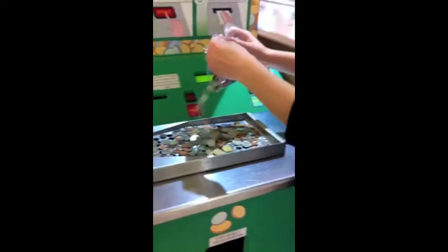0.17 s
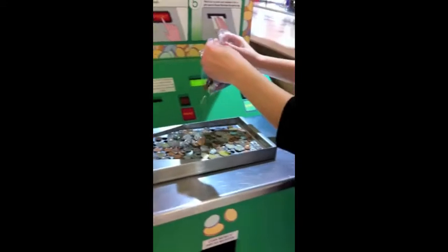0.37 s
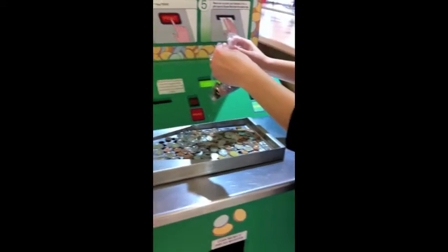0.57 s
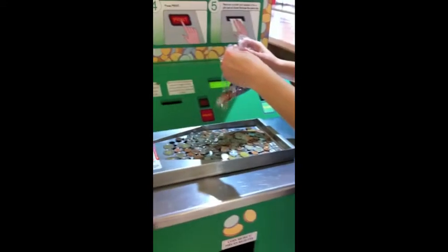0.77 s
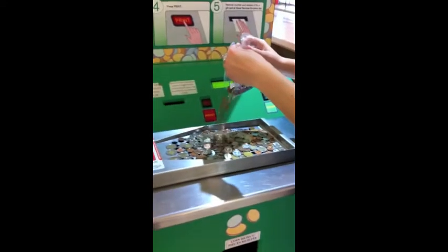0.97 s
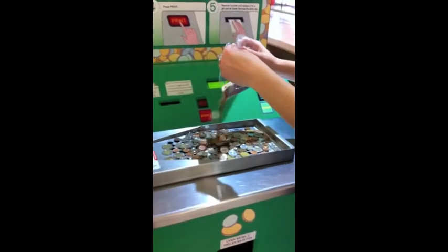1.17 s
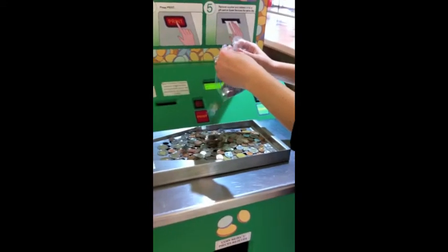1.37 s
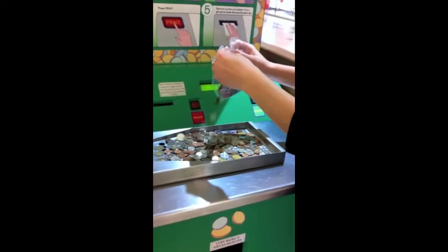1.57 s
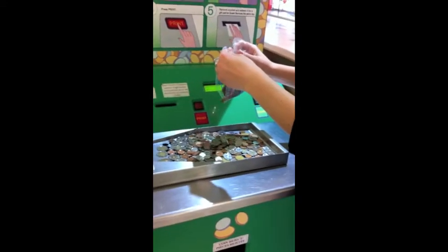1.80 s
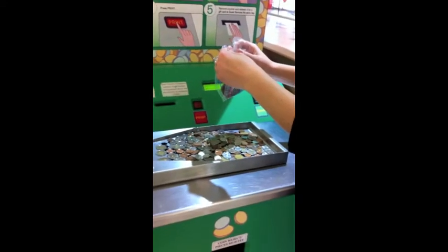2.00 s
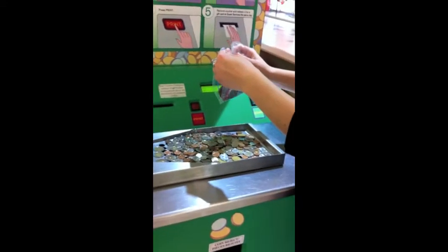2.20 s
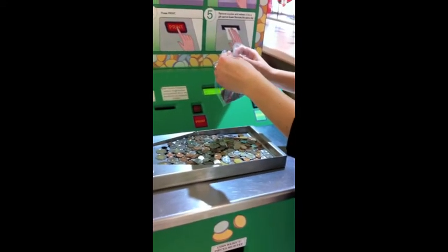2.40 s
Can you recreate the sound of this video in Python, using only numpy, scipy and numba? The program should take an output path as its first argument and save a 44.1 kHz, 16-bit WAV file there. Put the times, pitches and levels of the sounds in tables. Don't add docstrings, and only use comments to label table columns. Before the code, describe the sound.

After a brief faded-in hum and faint knocks, dense bright coin clatter bursts out and continues in waves, then stops almost abruptly, leaving tiny ticks and room hum; close phone pickup indoors.

```python
import sys
import numpy as np
from scipy import signal
from scipy.fft import rfft, irfft
from scipy.io import wavfile
from numba import njit

SR = 44100
rng = np.random.default_rng(int(sys.argv[2]) if len(sys.argv) > 2 else 0)


def bounce(signal):
    frames = np.transpose(np.atleast_2d(signal))
    limited = np.clip(frames, -1, 1)
    pcm = np.round(limited * 32767).astype(np.int16)
    wavfile.write(sys.argv[1], SR, pcm)


def ratio_of_db(decibels):
    return 10 ** (np.asarray(decibels, float) / 20)


N = 108045


def curve_db(table, hz):
    table = np.array(table, float)
    return np.interp(np.log(hz), np.log(table[:, 0]), table[:, 1])


def samples(seconds):
    return (seconds * SR).astype(np.int64).ravel()


@njit
def ring(start, hz, t60, size, count):
    y = np.zeros(count)
    for k in range(len(start)):
        turn = np.exp(2j * np.pi * hz[k] / SR - np.log(1000) / (t60[k] * SR))
        z = size[k] + 0j
        for i in range(start[k], min(count, start[k] + int(t60[k] * SR * 0.7))):
            y[i] += z.imag
            z *= turn
    return y


def scatter(shape):
    size = ratio_of_db(1.5 * np.minimum(rng.exponential(size=shape), 4))
    return size / np.sqrt(np.mean(size ** 2, axis=-1, keepdims=True))


# t/s, peak level/dB, tray level/dB, spread/s
HANDFULS = [(0.2243, -7.5, -18, 0.012), (0.3048, -6, -20, 0.015), (0.312, -11, -17, 0.012),
            (.343, -9, -14, 0.015), (0.373, -6.5, -28, 0.017), (.384, -12, -22, 0.012),
            (.45, -16, -24, .025), (.468, -9.5, -16, 0.019), (0.4816, -5, -20, 0.011),
            (.507, -12, -24, 0.011), (0.5895, -7, -30, 0.0085), (.6291, -12, -39, 0.0057),
            (.648, -18.5, -35, 0.0084), (0.6707, -11.5, -19, 0.015), (0.765, -8.5, -11, 0.013),
            (0.8452, -4.5, -18.5, 0.0089), (0.9262, -17.5, -15, 0.014), (1.017, -9, -23, .016),
            (1.027, -4, -20, 0.01), (1.0454, -6.5, -21, 0.018), (1.082, -11, -41, 0.02),
            (1.1, -6.5, -43, 0.021), (1.1323, -4.5, -36, 0.017), (1.1548, -6.5, -22, 0.015),
            (1.2087, -11.5, -18, 0.024), (1.246, -35, -5, 0.012),
            (1.303, -8, -14, .02), (1.346, -7.5, -24, 0.014), (1.367, -9.5, -49, 0.013),
                 (1.3974, -10, -19, 0.019), (1.44, -17, -32, 0.013), (1.5074, -5, -16, .011),
                 (1.52, -8.5, -25, 0.011), (1.555, -16, -35, 0.011), (1.6033, -5.5, -18.5, 0.0092),
                 (1.695, -39, -26, 0.014), (1.744, -6.5, -28, 0.0098), (1.792, -15, -23, 0.021),
                 (1.836, -25, -28, .011), (1.8566, -10, -24, 0.0068), (1.8943, -18.5, -10, .009),
                 (1.924, -15.5, -26, 0.0064), (1.966, -5.5, -13.5, 0.0082), (2.0205, -13, -22, 0.0083),
                 (2.03, -14.5, -31, .018), (2.066, -16, -22, 0.0066), (2.104, -27, -23, 0.0095),
                 (2.119, -20.5, -28, 0.019), (2.1438, -8.5, -15.5, 0.007), (2.165, -23.5, -26, 0.022),
                 (2.198, -19.5, -18, 0.0077)]
LAND_DB, TRAY_DB = -11, 15
SOFT_TILT_DB = 0.16
RUN_SHAPE = 0.75


def handfuls(count=55):
    s, db, tray_db, spread = np.array(HANDFULS, float).T
    shape = (len(s), count)
    order = (np.arange(count) + rng.random(shape)) / (count + 0.5)
    delay = 0.65 * (-np.log(1 - order)) ** RUN_SHAPE
    when = s[:, None] + spread[:, None] * delay
    peak = ratio_of_db(db + LAND_DB) * np.sqrt(spread / 0.012)
    size = peak[:, None] * scatter(shape) / 2
    tilt_db = np.repeat(SOFT_TILT_DB * (db + 8), count)[:, None]
    coins = contacts(when.ravel(), size.ravel(), tilt_db)
    blow = size * ratio_of_db(tray_db + TRAY_DB)[:, None] / 4
    return coins + tray(when[:, 1::4].ravel(), blow[:, 1::4].ravel())


# f/Hz, level/dB
COIN_TONE = [(530, -40), (900, -14.5), (1240, -8.5), (1540, -15), (2680, -14.5), (3090, -9.5), (8170, -5),
             (11000, 0.5), (15800, -2.5)]
# f/Hz, level/dB
COIN_NOTES = [(9076, -52), (9905, -51), (10680, -48), (11256, -48), (13281, -48), (14217, -50),
              (15655, -51)]
CRACK_T60_S, RING_T60_S, T60_SPREAD = 0.0063, 0.063, 0.37
RING_DB, NOTE_DB, DETUNE = -7, -44, 0.0068


def contacts(when, size, tilt_db=0):
    u = rng.random((len(when), 7))
    g = rng.standard_normal((len(when), 7))
    hz = 900 + 15000 * u
    notes = np.array(COIN_NOTES)
    pick = (u[:, -1] * len(notes)).astype(int)
    hz[:, -1] = notes[pick, 0] * (1 + DETUNE * g[:, 0])
    kind = np.arange(7) // 3
    t60 = np.where(kind > 0, RING_T60_S, CRACK_T60_S) * np.exp(T60_SPREAD * np.clip(g, -2, 2))
    db = curve_db(COIN_TONE, hz) + np.array([0, RING_DB, NOTE_DB])[kind]
    db = db + tilt_db * np.log2(hz / 8000)
    gain = size[:, None] * ratio_of_db(db) * np.sign(g) / np.sqrt(t60 / np.median(t60, axis=0))
    start = np.repeat(samples(when), 7)
    return ring(start, np.minimum(hz, 0.45 * SR).ravel(), t60.ravel(), gain.ravel(), N)


# f/Hz, width/Hz, level/dB
TRAY_NOTES = [(868, 71, -6.5), (1220, 310, 2), (1706, 41, -14.5), (2245, 118, -4), (3010, 125, -8.5),
              (4140, 230, -3)]


def tray(when, size):
    hz, width, db = np.array(TRAY_NOTES, float).T
    g = rng.standard_normal((len(when), len(hz), 2))
    start = np.repeat(samples(when), len(hz))
    pitch = hz * (1 + 0.019 * g[..., 0])
    t60 = np.tile(np.clip(3.5 / width, 0.012, 0.06), len(when))
    gain = size[:, None] * ratio_of_db(db) * g[..., 1]
    return ring(start, pitch.ravel(), t60, gain.ravel(), N)


# t/s, peak level/dB
HARD_CRACKS = [(0.2281, -4), (0.5917, -7), (0.7834, -16), (1.0275, 4), (1.6051, -18), (1.7346, -4),
               (1.7472, -2), (1.8426, -21), (1.8575, -22), (2.068, -19), (2.1089, -28), (2.1271, -22),
               (2.2003, -23)]
CRACK_DB = -35


def cracks(count=8):
    s, db = np.array(HARD_CRACKS, float).T
    return contacts(np.repeat(s, count), np.repeat(ratio_of_db(db + CRACK_DB), count))


# t/s, level/dB, spread/s
LIGHT_TICKS = [(.5905, -14, .004), (.769, -19, .004), (0.9279, -15.5, .012), (1.019, -14, .006),
               (1.856, -17, 0.0036), (2.177, -23, 0.0063), (2.238, -45, .004), (2.26, -46, .004),
               (2.29, -36, 0.0036), (2.307, -37, 0.0053), (2.3334, -31.5, 0.0036), (2.35, -29, 0.0031),
               (2.356, -36, 0.0065), (2.375, -38, 0.0047), (2.385, -35.5, .006)]
TICK_DB, TICK_TILT_DB = -14.5, 6


def ticks(count=16):
    s, db, spread = np.array(LIGHT_TICKS, float).T
    when = s[:, None] + spread[:, None] * rng.random((len(s), count)) ** 2
    return contacts(when.ravel(), np.repeat(ratio_of_db(db + TICK_DB), count), TICK_TILT_DB)


# t/s, peak level/dB, f/Hz of the panel
HEAVY_BLOWS = [(0.227, -24, 883), (0.305, -31, 1200), (0.351, -36, 890), (0.481, -19.5, 870),
               (0.766, -37, 874), (.769, -37, 1160), (0.846, -30, 1220), (.848, -33, 873),
               (1.033, -21.5, 1220), (1.157, -29, 856), (1.306, -19.5, 1120), (1.509, -20, 860),
               (1.515, -26, 1195), (1.607, -27, 870), (1.744, -26, 1110), (1.969, -22, 1220),
               (1.745, -29, 825), (2.145, -36, 800), (2.142, -30, 1196), (2.239, -25.5, 790)]
BLOW_DB, BLOW_T60_S, BLOW_SPREAD_S = -11.5, 0.045, 0.011


def blows(count=4):
    s, db, hz = np.array(HEAVY_BLOWS, float).T
    u = rng.random((len(s), count, 2))
    start = samples(s[:, None] + BLOW_SPREAD_S * u[..., 0])
    pitch = hz[:, None] * (1 + 0.2 * (u[..., 1] - 0.5))
    t60 = np.full(len(start), BLOW_T60_S)
    return ring(start, pitch.ravel(), t60, np.repeat(ratio_of_db(db + BLOW_DB), count), N)


# t/s, level/dB
TRICKLE_FLOW = [(0.05, -41), (0.17, -42.5), (0.41, -20), (0.44, -21.5), (0.52, -19), (0.72, -29.5),
                (0.89, -26.5), (1.05, -25.5), (1.23, -22), (1.46, -25.5), (1.56, -22.5), (2.0, -30),
                (2.05, -34), (2.15, -28), (2.21, -41), (2.23, -42), (2.36, -40.5), (2.45, -71)]
TRICKLE_DB, TRICKLE_TRAY_DB, CLUMP_DB = -7, -29, 2


def trickle(count=5000):
    when = rng.random(count) * N / SR
    clump = np.interp(when, np.linspace(0, N / SR, 200), rng.standard_normal(200))
    flow_db = np.interp(when, *np.array(TRICKLE_FLOW).T)
    size = ratio_of_db(flow_db + TRICKLE_DB + CLUMP_DB * clump) * scatter(count)
    return contacts(when, size) + tray(when[::4], size[::4] * ratio_of_db(TRICKLE_TRAY_DB + TRAY_DB))


# t/s, f/Hz, level/dB, t60/s
FREE_COINS = [(0.314, 4200, -15, 0.015), (0.6, 3300, -27, 0.054), (.630, 11250, -20, 0.095),
              (0.714, 13100, -35, 0.18), (.975, 10100, -39, 0.078), (.772, 15500, -31, .15),
              (0.931, 15600, -28, .12), (1.36, 10640, -29, .1), (1.42, 14040, -26, .08),
              (1.54, 11370, -24, 0.088), (1.654, 12550, -30, .12), (1.89, 9950, -43, .12),
              (1.299, 8400, -40, .1), (1.49, 10700, -25, 0.11),
              (0.349, 2920, -33, .06), (.38, 3840, -27, 0.055), (.38, 5800, -24, .06),
               (.483, 3860, -27, .07), (.485, 5030, -25, .06), (1.1, 4370, -40, .08),
               (1.16, 2430, -38, .08), (1.171, 4000, -32, .08), (1.19, 2950, -34, .08),
               (1.311, 3140, -38, .08), (1.351, 5920, -33, .08), (1.39, 3230, -37, 0.086),
               (1.512, 6700, -25, 0.052), (1.605, 4715, -37, .08), (1.745, 3000, -35, .06),
               (1.78, 1680, -38, 0.092), (1.968, 7140, -33, .06), (2.03, 3060, -45, .08)]


def pings():
    s, hz, db, t60 = np.array(FREE_COINS).T
    return ring(samples(s), hz, t60, ratio_of_db(db), N)


# t/s, level/dB
TRAY_KNOCKS = [
    (.182, -44),
    (.191, -43),
    (.204, -47),
    (2.235, -45),
    (2.244, -48),
]
KNOCK_LOW_HZ, KNOCK_HIGH_HZ, KNOCK_T60_S = 800, 2570, 0.032


def knocks(count=30):
    s, db = np.array(TRAY_KNOCKS).T
    u = rng.random((len(s), count, 2))
    hz = KNOCK_LOW_HZ * (KNOCK_HIGH_HZ / KNOCK_LOW_HZ) ** u[..., 1]
    start = samples(s[:, None] + 0.012 * u[..., 0])
    t60 = np.full(len(start), KNOCK_T60_S)
    return ring(start, hz.ravel(), t60, np.repeat(ratio_of_db(db - 6.5), count), N)


# t/s, start f/Hz, end f/Hz, level/dB, length/s
FLOOR_BEND = (1.955, 395, 335, -40, .085)


def flex():
    s, from_hz, to_hz, db, length = FLOOR_BEND
    u = np.clip((np.arange(N) / SR - s) / length, 0, 1)
    hz = to_hz + (from_hz - to_hz) * (1 - u) ** 2
    swell = np.sqrt(np.sin(np.pi * u) + 1e-18)
    return ratio_of_db(db) * swell * np.sin(2 * np.pi * np.cumsum(hz) / SR)


# t/s, level/dB
HAND_BUMPS = [(.06, -60), (.14, -55), (.25, -49), (.3, -49), (.59, -54), (.665, -57), (.85, -55),
              (.92, -52), (1.15, -60), (1.305, -43), (1.5, -56), (1.59, -53), (1.74, -51), (1.855, -58),
              (1.965, -51), (2.1, -46), (2.32, -60), (2.37, -56)]
THUMP_HZ, THUMP_T60_S = 45.5, 0.096


def thumps():
    s, db = np.array(HAND_BUMPS).T
    return ring(samples(s), np.full(len(s), THUMP_HZ), np.full(len(s), THUMP_T60_S), ratio_of_db(db), N)


ROOM_T60_S, ROOM_DB = 0.26, -11.5


def room(near):
    t = np.arange(SR // 2) / SR
    echo = rng.standard_normal(len(t)) * ratio_of_db(-60 * t / ROOM_T60_S) * (t > 0.004)
    echo = echo / np.sqrt(np.sum(echo ** 2))
    return ratio_of_db(ROOM_DB) * signal.fftconvolve(near, echo)[:N]


# f/Hz, level/dB
SHOP_TONE = [(20, -46), (85, -26), (125, -4), (231, 3.5), (1120, -5), (1860, -9.5), (3730, -18.5),
             (13500, -23.5), (15000, -33)]
# t/s, level/dB
SHOP_SWELL = [
    (.02, 3),
    (.1, 2.5),
    (.35, -0.5),
    (.55, -3.5),
    (.8, -0.5),
    (1.3, 1.5),
    (1.6, 0),
    (2.0, 1),
    (2.45, 0.5),
]
SHOP_DB = -44


def shop():
    hz = np.maximum(np.arange(N // 2 + 1) * SR / N, 1)
    tone = ratio_of_db(curve_db(SHOP_TONE, hz))
    out = 0
    for mid in 30 * 2 ** np.arange(0, 9.2, 0.25):
        bell = np.exp(-(np.log2(hz / mid) / 0.15) ** 2)
        band = irfft(rfft(rng.standard_normal(N)) * tone * bell, N)
        flicker = np.interp(np.arange(N), np.linspace(0, N, 30), rng.standard_normal(30))
        out = out + band * ratio_of_db(2 * flicker)
    swell_db = np.interp(np.arange(N) / SR, *np.array(SHOP_SWELL).T)
    return out / np.std(out) * ratio_of_db(SHOP_DB + swell_db)


def scene():
    near = handfuls() + cracks() + ticks() + blows() + trickle() + knocks()
    near = signal.sosfilt(signal.butter(2, 400, "high", fs=SR, output="sos"), near)
    return (near + room(near) + pings() + flex() + thumps() + shop())[None]


def roll_off(x):
    return signal.sosfilt(signal.butter(12, 16810, fs=SR, output="sos"), x)


# t/s, level/dB, half length/s, upper edge f/Hz
TREBLE_DROPOUTS = [
    (.2195, -35, .0028, 16000),
    (.292, -8, .011, 9000),
    (.756, -16, .005, 10000),
    (.922, -16, .006, 9500),
    (1.499, -22, .005, 16000),
    (1.737, -5, .008, 16000),
    (1.851, -9, .003, 16000),
    (1.961, -30, .0035, 16000),
    (2.115, -5, .004, 16000),
    (2.325, -9, .007, 16000),
]
FADE_START_S, FADE_IN_S, FADE_OUT_S, FADE_END_DB = 0.023, 0.15, 2.404, -9.5
TOP_HZ = 15800


def record(dry):
    t, x = np.arange(N) / SR, dry
    for s, db, half, top_hz in TREBLE_DROPOUTS:
        band_pass = signal.butter(4, [1800, top_hz], "band", fs=SR, output="sos")
        treble = signal.sosfiltfilt(band_pass, dry)
        dip = ratio_of_db(db * np.exp(-((t - s) / half) ** 4))
        x = x - treble * (1 - dip)
    fade_in = np.clip((t - FADE_START_S) / FADE_IN_S, 0, 1) ** 0.95
    fade_out = ratio_of_db(FADE_END_DB * np.clip((t - FADE_OUT_S) / 0.16, 0, 1))
    top_cut = signal.ellip(10, 0.2, 70, TOP_HZ, fs=SR, output="sos")
    x = signal.sosfilt(top_cut, x * (fade_in * fade_out))
    return roll_off(x)


dry = scene()
out = record(dry)
bounce(out)
```